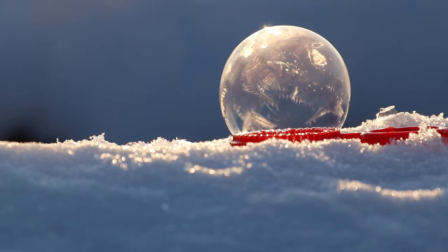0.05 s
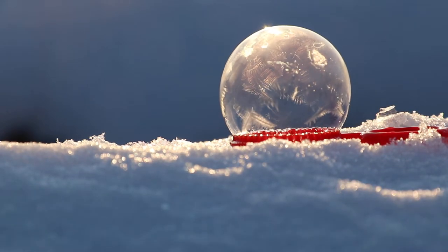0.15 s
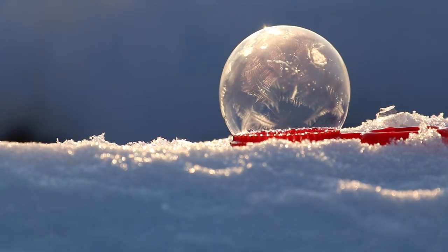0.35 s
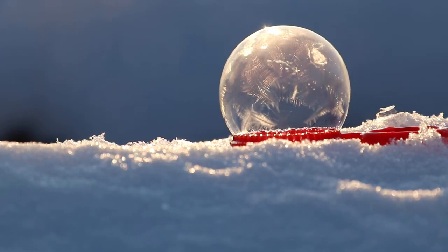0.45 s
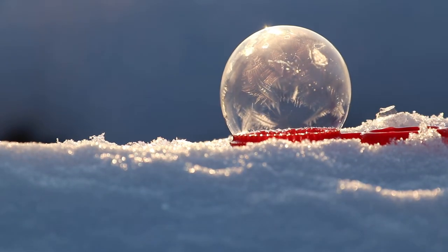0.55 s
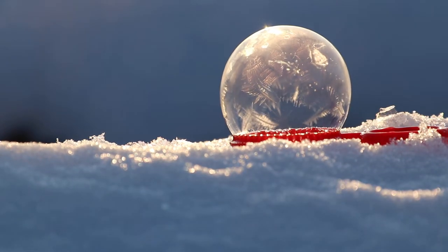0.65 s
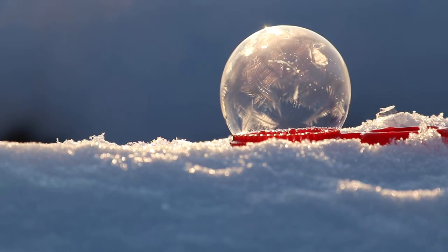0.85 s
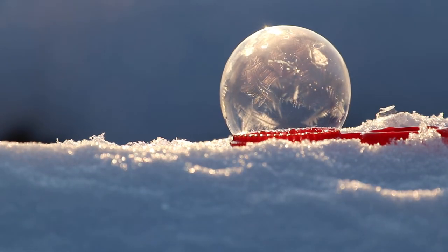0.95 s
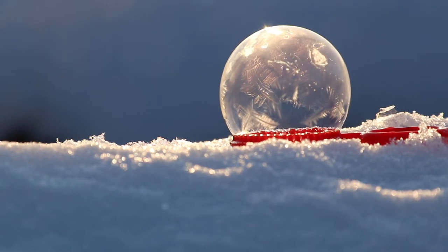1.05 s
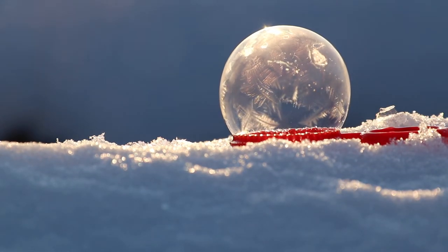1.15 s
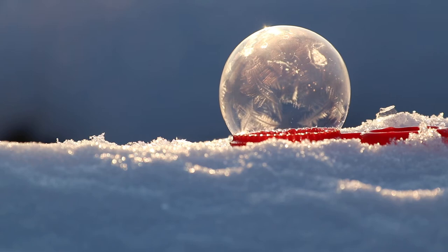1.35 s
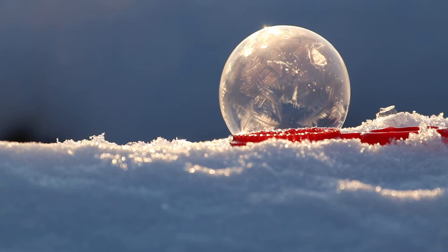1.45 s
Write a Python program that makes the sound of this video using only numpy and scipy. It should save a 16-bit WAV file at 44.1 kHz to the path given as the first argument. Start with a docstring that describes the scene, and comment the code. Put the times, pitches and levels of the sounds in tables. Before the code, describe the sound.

A big dog barks once in the distance outdoors, then a small bird calls faintly.

```python
"""A still winter day: outdoor rumble and hiss run throughout, with a light rustle and soft bumps close by.
Just after a dry crackle, a big dog barks once, some way off to the right: puffs of air ring its throat
as its mouth opens, and the surroundings ring on. A far motor hum fades in and faint birds call.
Last, a small bird gives a thin falling whistle, quickening ticks and a short buzz."""
import sys
import numpy as np
from scipy import signal
from scipy.fft import rfft, irfft, next_fast_len
from scipy.io import wavfile
from scipy.ndimage import map_coordinates

SR = 44100
rng = np.random.default_rng(int(sys.argv[2]) if len(sys.argv) > 2 else 0)


def inscribe(sig):
    """Save sig as 16-bit PCM at rate SR to the path in sys.argv[1].

    A 1-D sig is mono; a 2-D sig holds one channel per row.
    Samples are clipped to [-1, 1] before scaling.
    """
    pcm = np.round(np.clip(np.atleast_2d(sig).T, -1, 1) * 32767)
    wavfile.write(sys.argv[1], SR, pcm.astype(np.int16))


N = 66150
T = np.arange(N) / SR


def amp(db):
    """Turn decibels into a number to multiply by."""
    return 10 ** (np.asarray(db) / 20)


def unit(x):
    """Scale x to an average strength (rms) of 1."""
    return x / np.sqrt(np.mean(x ** 2) + 1e-20)


def along(points, hz):
    """Read between (Hz, value) points on a log frequency scale."""
    f, values = np.transpose(points)
    return np.interp(np.log(hz + 1), np.log(f + 1), values)


def gesture(rows):
    """Join (s, Hz, dB) rows into pitch and gain curves; silent outside them."""
    s, hz, db = np.transpose(rows)
    return np.interp(T, s, hz), amp(np.interp(T, s, db)) * (T >= s[0]) * (T <= s[-1])


def wobble(rate):
    """A smooth random curve through `rate` points a second."""
    return map_coordinates(rng.standard_normal(2048), [T * rate], mode="wrap")


def phase(hz):
    """The running angle of a wave whose pitch changes."""
    return 2 * np.pi * np.cumsum(hz) / SR


def filtered(x, response):
    """Multiply each frequency f in x by response(f)."""
    size = next_fast_len(N + SR // 2)
    return irfft(rfft(x, size) * response(np.fft.rfftfreq(size, 1 / SR)), size)[..., :N]


def panned(x, left_db):
    """Make the left ear louder by left_db; below zero leans right."""
    return x * amp(np.array([[left_db], [-left_db]]) / 2)


def lagged(x, lag_s):
    """Make the left ear hear x later by lag_s; below zero leans left."""
    return filtered(x, lambda f: np.exp(1j * np.pi * f * lag_s * np.array([[-1], [1]])))


def noise(colour, likeness):
    """Stereo noise with a given tone colour; likeness 1 means both ears hear the same."""
    def shares(f):
        turn = np.arccos(np.clip(along(likeness, f), -1, 1)) / 2
        return amp(along(colour, f)) * [np.cos(turn), np.sin(turn)]
    mid, side = filtered(rng.standard_normal((2, N)), shares)
    return unit(np.array([mid + side, mid - side]))


# Tone colour of the outdoor air: f/Hz, relative level/dB
AIR_COLOUR = [(18, -35), (30, -3.5), (69, -1), (213, -10), (332, -8.5), (505, -10.5), (607, -8.5),
              (673, -12), (922, -9), (997, -12.5), (1510, -15.5), (1920, -19), (3680, -22), (9690, -31),
              (15500, -43)]
# How alike the ears hear the air and the other noises: f/Hz, likeness/0-1
NOISE_LIKENESS = [(60, .98), (250, 0.92), (600, 0.87), (1500, 0.067), (6000, 0.046)]
def outdoor_air():
    """Steady low rumble and soft hiss, leaning left."""
    level_db = -45.5 + .25 * wobble(4.47)
    return amp(level_db) * lagged(noise(AIR_COLOUR, NOISE_LIKENESS), lag_s=-.00017)


# Swishes of the rustle: middle t/s, half length/s, centre f/Hz, width/octaves, level/dB
RUSTLE_SWISHES = [(0.083, .11, 5500, 0.83, -48.5), (0.286, .03, 8000, .3, -54),
                  (0.418, 0.073, 6260, 0.34, -46), (0.463, 0.1, 4500, 1.14, -49.5),
                  (0.846, 0.015, 9500, 0.29, -58.5), (0.872, 0.045, 5500, 1.1, -56)]
def rustle():
    """Bands of grainy hiss swell and fade, like cloth or dry snow."""
    out = np.zeros((2, N))
    for s, half, centre, octaves, db in RUSTLE_SWISHES:
        band = lambda f: np.exp(-(np.log2((f + 1) / centre) / octaves) ** 2)
        lows = lambda f: amp(-9) / (1 + (f / centre) ** 2)
        hiss = unit(filtered(noise([(1, 0)], NOISE_LIKENESS), lambda f: band(f) + lows(f)))
        out += amp(db + wobble(250)) * np.exp(-((T - s) / half) ** 2) * hiss
    return panned(out, left_db=-3)


# Soft bumps close by: t/s, f/Hz, level/dB
SOFT_BUMPS = [(0.058, 240, -30.5), (.078, 302, -32), (.115, 242, -32), (0.144, 188, -34.5),
              (0.352, 276, -32), (.522, 223, -24.5), (1.031, 223, -36), (1.064, 237, -37.5)]
# Tone colour of their scuffing: f/Hz, relative level/dB
SCUFF_TONE = [(80, -10), (300, 0), (900, -11), (2500, -32), (10000, -55)]
def bumps(thud_s=.0029, scuff_s=.009, scuff_db=-8):
    """Each dull bump is a wave or two of a low note, wrapped in a little scuffing noise."""
    scuff = amp(scuff_db) * noise(SCUFF_TONE, NOISE_LIKENESS)
    out = np.zeros((2, N))
    for s, hz, db in SOFT_BUMPS:
        t = T - s
        thud = -np.sin(2 * np.pi * hz * t) * np.exp(-(t / thud_s) ** 2)
        out += amp(db) * (thud + scuff * np.exp(-np.abs(t) / scuff_s))
    return out


# Tone colour of the crackle before it is dulled: f/Hz, relative level/dB
CRACKLE_TONE = [(500, 0), (3400, 0), (5000, -12), (9000, -22), (15000, -36)]
def crackle(start_s=.1442, fade_s=.018, top_hz=4800):
    """One dry burst of noise that starts sharply and dies at once."""
    gain = amp(-31 - 60 * np.abs(T - start_s) / fade_s) * (T >= start_s)
    burst = gain * noise(CRACKLE_TONE, NOISE_LIKENESS)
    dulled = filtered(burst, lambda f: 1 / np.sqrt(1 + (f / top_hz) ** 6))
    return panned(dulled, left_db=-3)


def throat(x, resonances, low_cut_hz):
    """The throat boosts the pitches it likes to ring at and passes little deep bass."""
    def response(f):
        peaks = sum((-1) ** k * amp(db) * 1j * f * width / (hz * hz - f * f + 1j * f * width)
                    for k, (hz, width, db) in enumerate(resonances))
        return peaks * f ** 4 / (f ** 4 + low_cut_hz ** 4)
    return unit(filtered(x, response))


# Pitch and effort of the bark: t/s, f/Hz, level/dB
BARK_SHAPE = [(.178, 163.2, -54), (.186, 158.5, -26.5), (.203, 162.6, -17.5), (.212, 169.1, -14.5),
              (.226, 226.8, -14), (.238, 233.6, -15.5), (.26, 220.4, -20), (.292, 203.9, -16),
              (.305, 201, -24.5), (.34, 174.7, -35)]
# Where the throat rings with the mouth nearly shut: f/Hz, width/Hz, relative level/dB
MOUTH_SHUT = [(158, 47, -7.5), (490, 59, 10), (705, 450, -8.5), (1600, 170, -36)]
# The same with the mouth open: f/Hz, width/Hz, relative level/dB
MOUTH_OPEN = [(482.6, 40.5, -6.5), (657, 71, -0.5), (844, 86, -6.5), (941, 61, -2), (1131, 34, -13.5),
              (1371, 53, -22.5), (1900, 250, -20.5), (2480, 140, -25.5), (3604, 470, -29.5),
              (5070, 230, -41), (8200, 2100, -51)]
def dog(half_open_s=.2035, opening_s=.072, rasp_share=.36, bright_hz=1550):
    """Uneven puffs and raspy breath ring the throat as the mouth opens; more effort sounds brighter."""
    pitch, effort = gesture(BARK_SHAPE)
    angle = phase(pitch * (1 + .034 * wobble(150.3)) * (effort > 0))
    puffs = np.diff(np.floor(angle / (2 * np.pi)), prepend=0)  # one per cycle
    puffs = unit(puffs * amp(3 * wobble(199.9)))
    rasp = unit(rng.standard_normal(N) * (1 + np.cos(angle)) * (effort > 0))
    mouth = np.clip((T - half_open_s) / opening_s + .5, 0, 1) * np.pi / 2
    wide, shut = effort * np.sin(mouth), effort * np.cos(mouth)
    lows = lambda f: 1 / (1 + (f / bright_hz) ** 4)
    low = filtered((np.sqrt(1 - rasp_share) * puffs + np.sqrt(rasp_share) * rasp) * wide, lows)
    high = filtered(rasp * wide * (effort / effort.max()) ** .48, lambda f: 1 - lows(f))
    open_voice = throat(low + high, MOUTH_OPEN, low_cut_hz=BARK_OPEN_CUT_HZ) * wide.std()
    shut_voice = throat(puffs * shut, MOUTH_SHUT, low_cut_hz=BARK_SHUT_CUT_HZ) * shut.std()
    return open_voice + amp(-2) * shut_voice


# How alike the ears hear an echo: f/Hz, likeness/0-1
ECHO_LIKENESS = [(200, .95), (600, 0.42), (1000, 0.18), (3000, 0.097)]
def echo(x, fade_times, delay_s=.011, rise_s=.027):
    """A blur of reflections as strong as x; fade_times holds (Hz, seconds to fall 60 dB) points."""
    hz, t, bands = signal.stft(noise([(1, 0)], ECHO_LIKENESS), SR, nperseg=256)
    fade = amp(-60 * t / along(fade_times, hz)[:, None])
    tail = signal.istft(bands * fade, SR, nperseg=256)[1][:, :N]
    tail *= np.clip((T - delay_s) / rise_s, 0, 1)
    return unit(signal.fftconvolve(x[None], tail, axes=1)[:, :N]) * x.std()


# Tone colour of what the surroundings throw back: f/Hz, relative level/dB
ECHO_TONE = [(150, -11), (350, -4), (480, -2.5), (600, 5), (680, -6), (800, 10), (950, -7.5), (1500, -1),
             (2000, -26.5), (4000, 7.5)]
# How long that echo takes to fall 60 dB: f/Hz, t/s
ECHO_FADE = [(200, 0.49), (480, 0.88), (650, 0.82), (900, 0.72), (1500, 1), (3500, 0.16), (9000, 0.297)]
def surroundings(bark, dull_hz=6540, ring_hz=605, ring_fade_s=.65, roll_fade_s=2.9):
    """The bark, dulled by distance, then a wash of echoes, one ringing note and a faint far roll."""
    bark = filtered(bark, lambda f: 1 / np.sqrt(1 + (f / dull_hz) ** 4))
    thrown = filtered(bark, lambda f: amp(along(ECHO_TONE, f)))
    _, effort = gesture(BARK_SHAPE)
    held = signal.fftconvolve(effort, amp(-60 * T / ring_fade_s) * (T > .011))[:N]
    note = amp(.82 * wobble(23.8)) * np.sin(2 * np.pi * ring_hz * T + .5 * wobble(19.7))
    ring = amp(-5.5) * bark.std() * unit(held * note)
    wash = amp(1) * echo(thrown, ECHO_FADE)
    roll = amp(-15.5) * echo(thrown, [(1, roll_fade_s)])
    direct = panned(lagged(bark, lag_s=.00021), left_db=-5.5)
    return direct + panned(lagged(wash + ring + roll, lag_s=-.00025), left_db=.4)


# Notes of the far motor: f/Hz, level/dB
MOTOR_NOTES = [(54, -51), (75, -52), (343, -56)]
def motor(start_s=.62, rise_s=.67):
    """A far motor's hum fades in: three low, wavering notes."""
    hum = np.zeros(N)
    for hz, db in MOTOR_NOTES:
        gain = np.sqrt(2) * amp(db + 1.3 * wobble(7.87))
        hum += gain * np.sin(2 * np.pi * hz * T + 1.12 * wobble(10.25))
    return hum * np.clip((T - start_s) / rise_s, 0, 1)


# Calls of birds farther off: t/s, length/s, start f/Hz, end f/Hz, level/dB
FAR_CHIRPS = [(.635, .05, 4500, 4900, -58), (.68, .08, 5150, 4900, -59), (.995, .018, 5900, 6100, -53),
              (1.042, .02, 4400, 3700, -53), (1.165, .02, 3400, 2700, -53), (1.24, .08, 4150, 4050, -56),
              (1.268, .022, 3600, 2600, -52)]
def far_birds(echo_fade_s=.2):
    """Short, faint sliding notes, blurred by distance."""
    calls = np.zeros(N)
    for s, length, start_hz, end_hz, db in FAR_CHIRPS:
        progress = np.clip((T - s) / length, 0, 1)
        hz = (start_hz + (end_hz - start_hz) * progress) * (1 + .025 * wobble(700))
        calls += amp(db) * np.sin(np.pi * progress) * np.sin(phase(hz))
    return calls + amp(-4.5) * echo(calls, [(1, echo_fade_s)])


# Path of the small bird's whistle: t/s, f/Hz, level/dB
WHISTLE_SHAPE = [(1.16, 8150, -68), (1.185, 8140, -54.5), (1.22, 7700, -57), (1.235, 7490, -47),
                 (1.265, 7090, -55), (1.32, 6900, -56.5), (1.39, 6980, -55.5), (1.44, 6920, -50),
                 (1.5, 6330, -59)]
def bird_whistle(flutter=.018):
    """One thin falling note that trembles in loudness and pitch."""
    hz, gain = gesture(WHISTLE_SHAPE)
    gain *= np.sqrt(2) * amp(1.1 * wobble(200))
    return gain * np.sin(phase(hz * (1 + flutter * wobble(900))))


# The small bird's ticks: t/s, f/Hz, level/dB
TICK_NOTES = [(1.279, 6000, -55), (1.306, 6000, -52), (1.322, 5970, -53), (1.33, 3920, -50),
              (1.337, 6130, -48), (1.345, 3920, -47), (1.353, 5990, -49), (1.362, 3850, -47.5),
              (1.369, 6030, -46), (1.3846, 6030, -41), (1.391, 4030, -38), (1.397, 4930, -41)]
def bird_ticks(half_length_s=.0017, climb_hz_per_s=90000):
    """Each tick is a rising chirp so short that it sounds like a click."""
    out = np.zeros(N)
    for s, hz, db in TICK_NOTES:
        t = T - s
        chirp = np.sin(2 * np.pi * t * (hz + climb_hz_per_s * t / 2))
        out += amp(db) * np.exp(-(t / half_length_s) ** 2) * chirp
    return out


# Path of the small bird's buzz: t/s, centre f/Hz, level/dB
BUZZ_SHAPE = [(1.399, 4500, -46.5), (1.408, 4450, -39.5), (1.43, 4054, -41), (1.437, 3590, -40.5),
              (1.446, 3670, -41.5), (1.456, 3180, -52)]
# Tone colour of its raspy edge: f/Hz, relative level/dB
RASP_TONE = [(3000, -33), (4300, -8), (5000, -2), (5450, 0.5), (5900, 3), (6350, -3), (6900, -9),
             (8000, -11), (10500, -14), (11500, -10), (12800, -31)]
def bird_buzz(trill_hz=215, calm_s=1.441, calming_s=.013):
    """A raspy note shakes fast in pitch and loudness, then settles lower and plainer."""
    hz, gain = gesture(BUZZ_SHAPE)
    beat = phase(trill_hz * (1 + .04 * wobble(110)) * (gain > 0))
    trill = np.clip((calm_s - T) / calming_s, .15, 1)
    hz *= 1 + .14 * trill * np.sin(beat) + .0286 * wobble(900)
    gain *= 1 + .55 * trill * np.cos(beat + .5)
    rasp = amp(-10) * noise(RASP_TONE, NOISE_LIKENESS)[0]
    return gain * (np.sqrt(2) * np.sin(phase(hz)) + rasp)


def small_bird(echo_fade_s=.2):
    """The whole song with a short echo; ticks and buzz sit farther right than the whistle."""
    whistle = bird_whistle()
    chatter = bird_ticks() + bird_buzz()
    direct = panned(whistle, left_db=-2) + panned(lagged(chatter, lag_s=.00018), left_db=-13.5)
    return direct + amp(-6) * echo(whistle + chatter, [(1, echo_fade_s)])


def scene():
    """Add up all the sounds, left and right."""
    animals = surroundings(dog()) + small_bird() + far_birds()
    close_by = bumps() + crackle() + rustle()
    return animals + close_by + motor() + outdoor_air()


def record(dry, low_cut_hz=24, top_hz=15700):
    """The recorder drops the deepest rumble and the very highest hiss."""
    return filtered(dry, lambda f: (f < top_hz) * f ** 4 / (f ** 4 + low_cut_hz ** 4))


BARK_OPEN_CUT_HZ, BARK_SHUT_CUT_HZ = 394, 69  # the bark carries little below these

dry = scene()
out = record(dry)
inscribe(out)
```